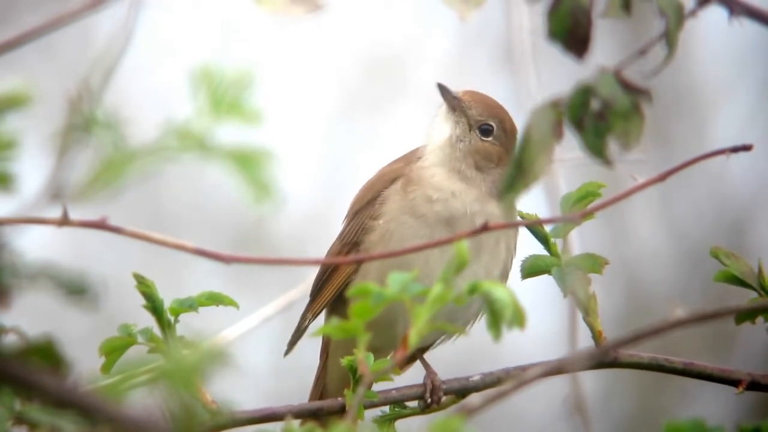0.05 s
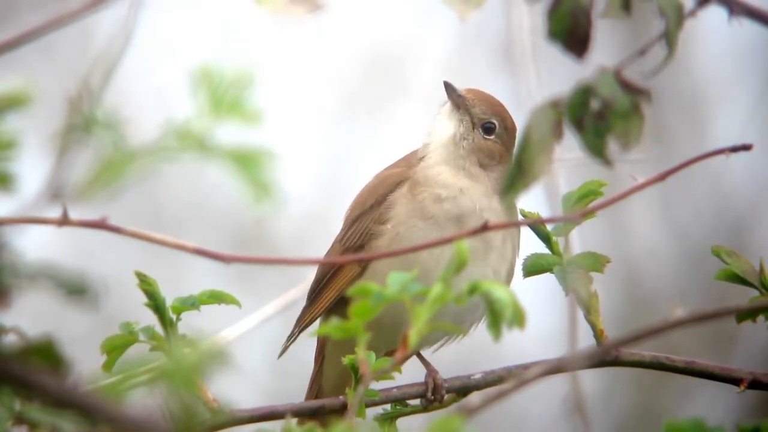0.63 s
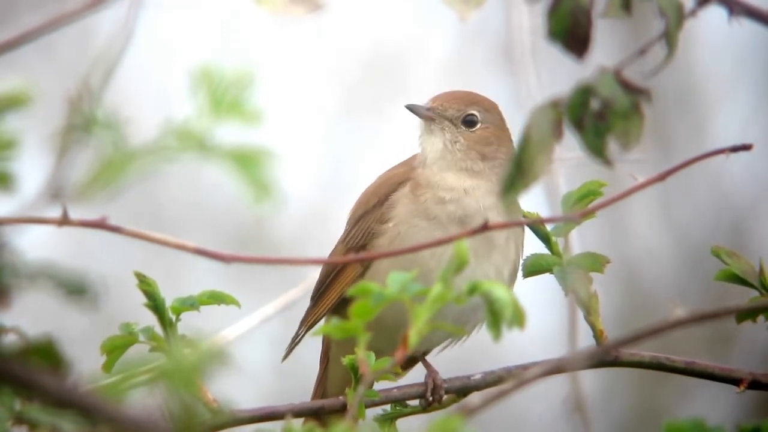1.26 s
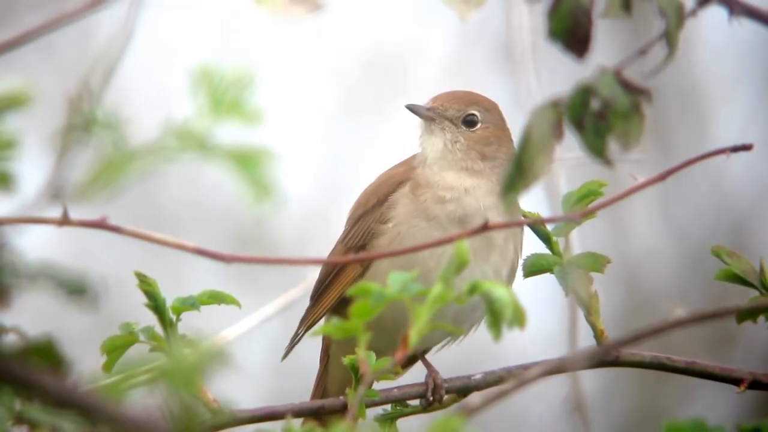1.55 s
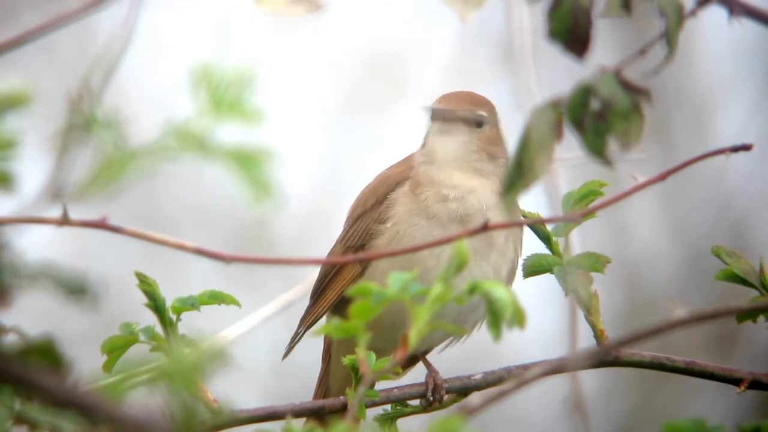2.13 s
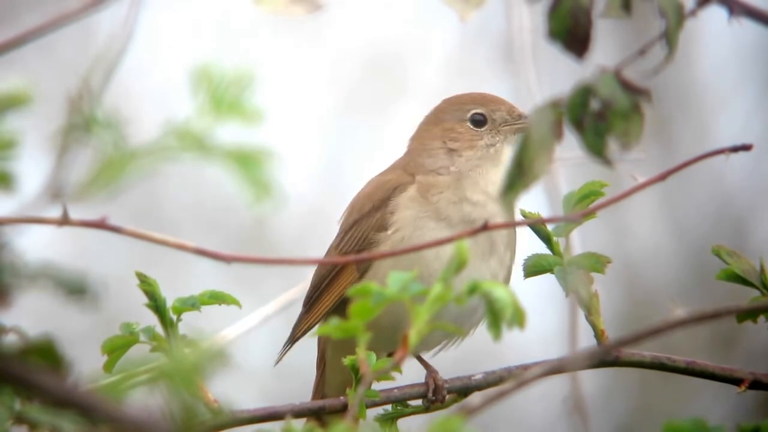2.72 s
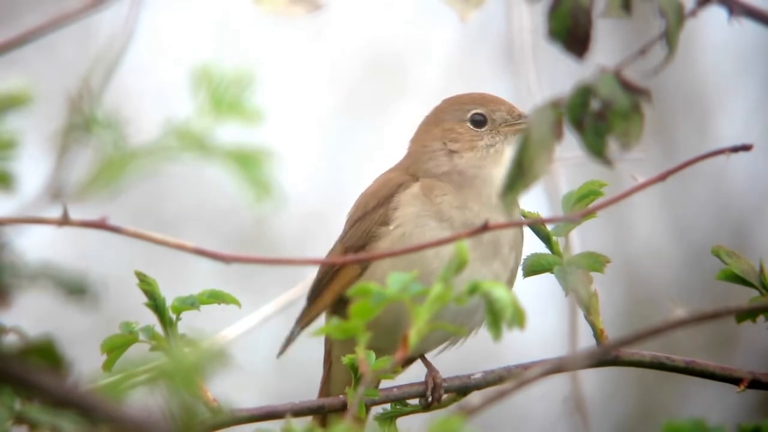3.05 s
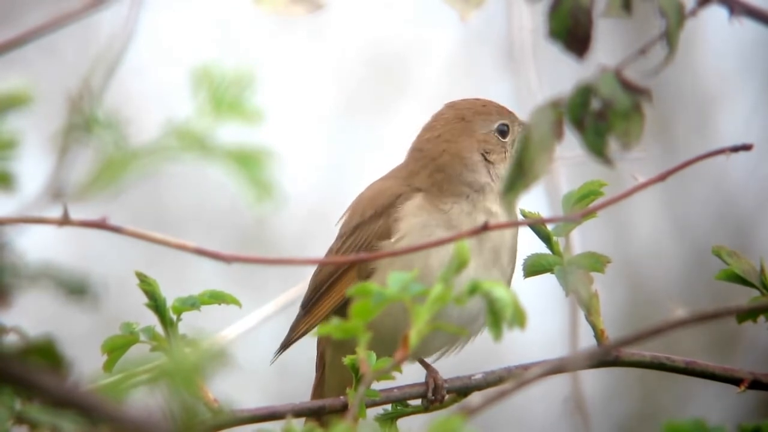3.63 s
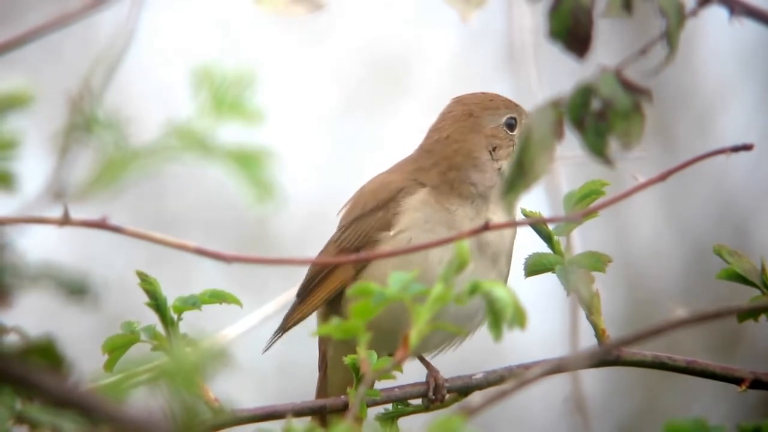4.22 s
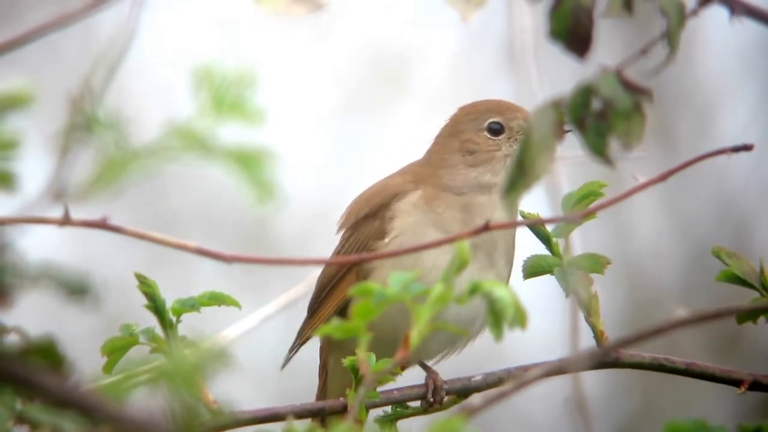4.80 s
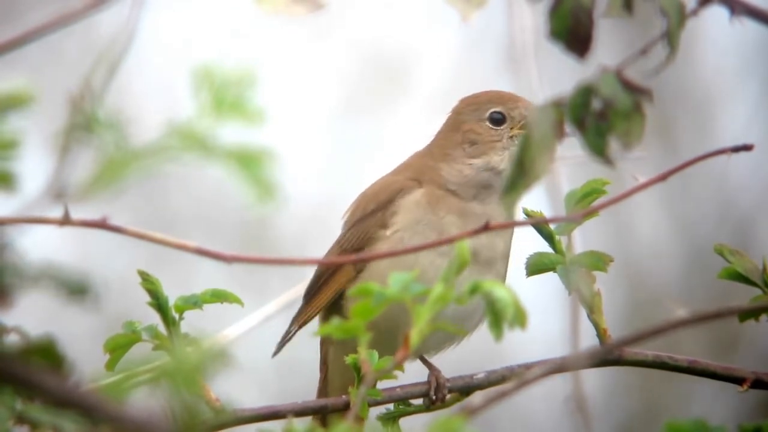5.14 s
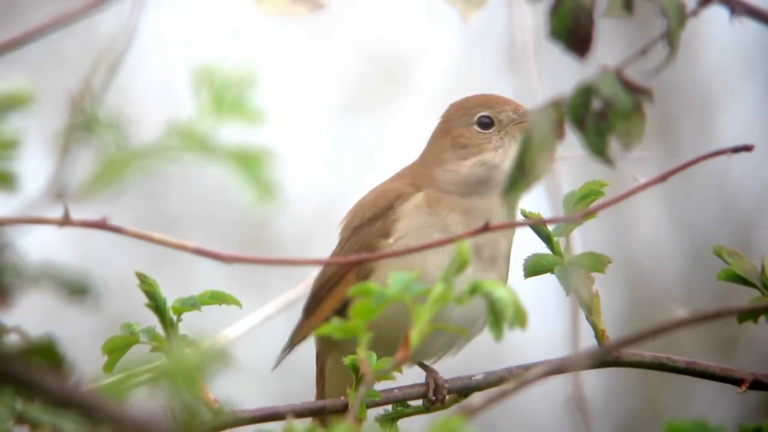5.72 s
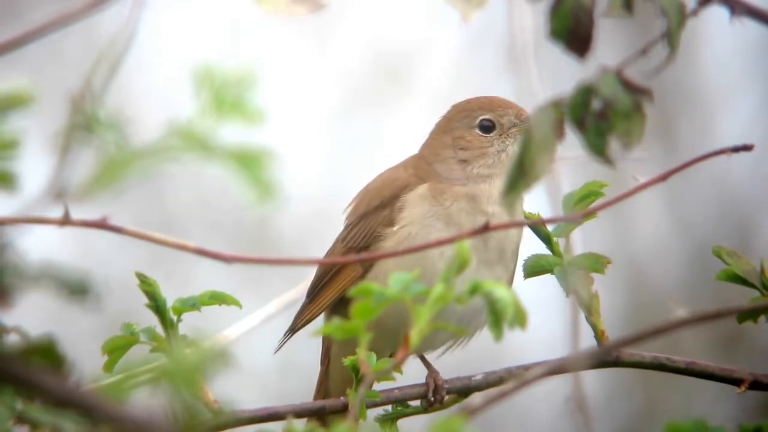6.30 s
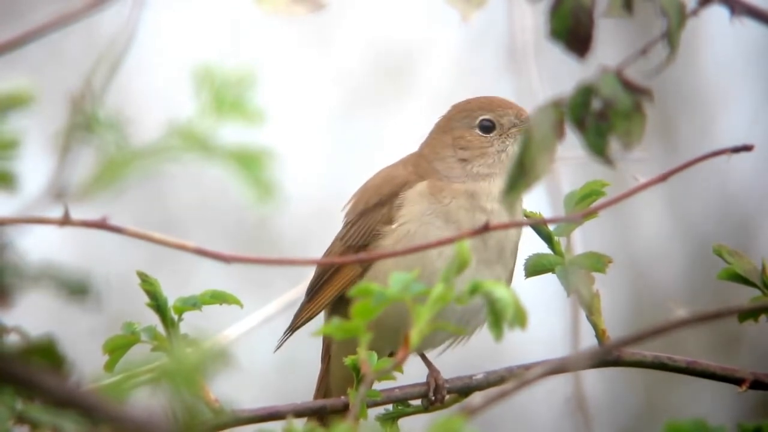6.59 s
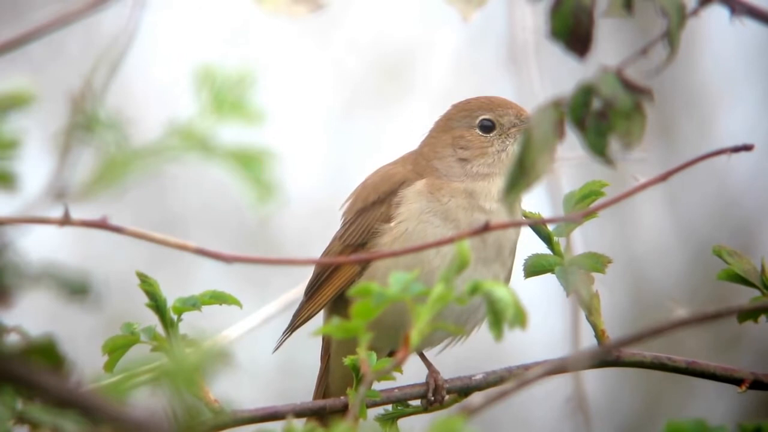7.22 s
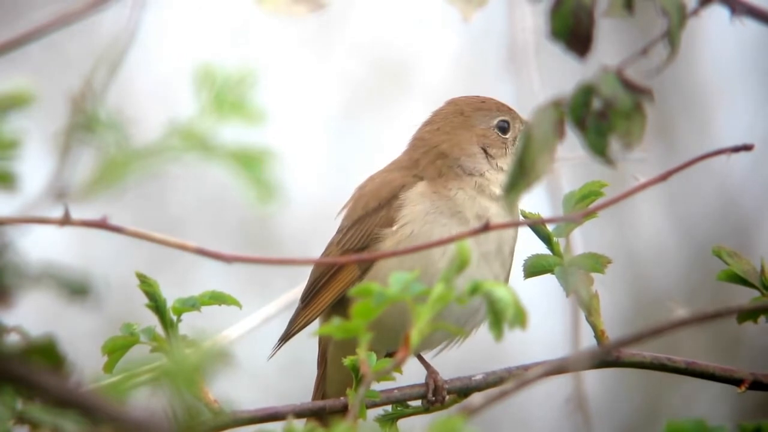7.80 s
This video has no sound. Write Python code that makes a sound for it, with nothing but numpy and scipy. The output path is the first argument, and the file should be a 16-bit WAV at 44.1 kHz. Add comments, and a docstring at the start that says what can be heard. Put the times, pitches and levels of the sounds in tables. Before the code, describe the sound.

Harsh bird calls and wind bumps give way to soft warbling and a close songbird's rising whistles, ending in a snap.

```python
"""A nightingale in a thicket. From the start, far traffic hums, the air rushes and small birds chip.
At 0.5 s a gull-like bird begins five harsh calls with unevenly shaking membranes; wind bumps the
microphone near 1.7, 2.5 and 4.7 s. From 2.7 s a second songbird warbles. At 3.85 s the nightingale
pushes air through its syrinx (a bird's voice box): seven rising whistles, each louder than the last,
then ticks, whips, chucks and, near 6 s, a sharp snap. Leaves and trunks give every note a short tail."""
import sys
import numpy as np
from scipy import signal
from scipy.fft import rfft, irfft
from scipy.io import wavfile
from scipy.ndimage import map_coordinates

SR = 44100
rng = np.random.default_rng(int(sys.argv[2]) if len(sys.argv) > 2 else 0)


def bounce(signal):
    """Save signal as a 16-bit WAV file at the path given by the first command-line argument."""
    frames = np.transpose(np.atleast_2d(signal))
    limited = np.clip(frames, -1, 1)
    pcm = np.round(limited * 32767).astype(np.int16)
    wavfile.write(sys.argv[1], SR, pcm)


N = 350595

# A note is one glide: t/s, length/s, level/dB, crest, then the pitches it passes through, f/Hz.
# The crest is where it is loudest (0 = start, 1 = end). Levels are set before echo and mixing.
# A stroke is a note timed from its syllable, a small group of notes sung together.

# The nightingale's whistles: t/s, length/s, level/dB, crest, middle f/Hz
WHISTLES = [(3.85, .098, -26.7, .76, 2232), (4.062, .125, -26.5, .66, 2230),
            (4.296, .125, -25.2, .62, 2310), (4.526, .12, -23.2, .57, 2280), (4.750, .11, -19.7, .58, 2290),
            (4.972, .117, -17.6, .58, 2265), (5.203, .112, -16.2, .55, 2280)]
# Steps away from the middle pitch, evenly spaced in time: f/Hz
WHISTLE_BEND = [-190, -200, -85, 80, 205, 220]


def whistles():
    """Almost pure tones that stay low, climb and level off, brightening as the beak opens."""
    notes = [(*note, *(hz + np.array(WHISTLE_BEND))) for *note, hz in WHISTLES]
    return sing(notes, fullness=1.05, waver=.0025, flutter_db=.46, overtone_db=6, opening_db=18)


# A tick, one quick drop: delay/s, length/s, level/dB, crest, pitches f/Hz
TICK = [(0, .01, 0, .28, 2100, 1720, 1370, 1200)]
# The ticks: t/s, level/dB
TICKS = [(5.383, -32), (5.419, -32), (5.463, -33.5)]
# The soft parts of a chuck: delay/s, length/s, crest, pitches f/Hz
CHUCK_MURMUR = (-.028, .017, .75, 1620, 1690, 1770, 1970)
CHUCK_FLICK = (-.016, .008, .5, 1890, 2440)
CHUCK_TRAIL = (.011, .012, .35, 2780, 2450)
# Its loud fall: delay/s, length/s, pitches f/Hz
CHUCK_FALL = (0, .013, 3900, 3280, 3020, 2780)
# The chucks: the fall's t/s, level/dB and crest, then flick level/dB relative to the fall
CHUCKS = [(5.703, -16.5, .45, -7.5), (5.790, -14.3, .45, -9), (5.8835, -14.5, .72, -6)]


def ticks_and_chucks():
    """Ticks drop quickly; in a chuck a low murmur flicks up, then a loud stroke falls and trails off."""
    notes = repeat(TICK, TICKS)
    delay, length, *pitches = CHUCK_FALL
    for start, db, crest, flick_db in CHUCKS:
        notes += [stroke(CHUCK_MURMUR, start, db - 18), stroke(CHUCK_FLICK, start, db + flick_db),
                  (start + delay, length, db, crest, *pitches), stroke(CHUCK_TRAIL, start, db - 7.5)]
    return sing(notes, fullness=.6, waver=.008, flutter_db=1, overtone_db=6, rasp_db=-16, falloff_db=-4.5)


# The three parts of a whip: delay/s, length/s, crest, pitches f/Hz
WHIP_FLICK = (0, .008, .65, 4300, 5700, 6700)
WHIP_ARCH = (.005, .018, .5, 5200, 6000, 5700, 4800)
WHIP_FALL = (.012, .025, .55, 5500, 4300, 3550, 3150)
# The whips: t/s, fall level/dB, then flick and arch level/dB relative to the fall
WHIPS = [(5.524, -20, -15, -8), (5.594, -26, -1, 2.5)]


def whips():
    """The voice flicks up, breaks into a harsh arch, then slides down."""
    notes = []
    for start, db, flick_db, arch_db in WHIPS:
        notes += [stroke(WHIP_FLICK, start, db + flick_db), stroke(WHIP_ARCH, start, db + arch_db),
                  stroke(WHIP_FALL, start, db)]
    return sing(notes, fullness=.8, waver=.015, flutter_db=1.5,
                overtone_db=-6, rasp_db=-16.5, octave_db=-3.5, falloff_db=-4)


# The notes inside the snap: t/s, length/s, level/dB, crest, pitches f/Hz
SNAP_NOTES = [(5.9505, .012, -25.5, .4, 4300, 5900, 5850, 5300), (5.9595, .014, -32, .3, 5100, 4500, 4000),
              (5.954, .016, -41, .25, 2700, 2100, 1450)]
# Its burst of noise: t/s, level/dB
SNAP_BURST = (5.9505, -21.5)
# The tone colour of that burst: f/Hz, level/dB
SNAP_COLOUR = [(900, -46), (2200, -17), (2900, -23), (4500, -9), (6000, -3), (7400, -19.5), (10500, -16.5),
               (15500, -28)]


def snap(rise_s=.0034, decay_s=.007):
    """Three tiny notes and a harsh burst of noise end the phrase."""
    out = sing(SNAP_NOTES, fullness=.8, waver=.03, flutter_db=2,
               overtone_db=-6, rasp_db=-12, octave_db=-4)
    start, db = SNAP_BURST
    t = np.arange(SR // 16) / SR
    burst = unit(colour(rng.standard_normal(len(t)), SNAP_COLOUR))
    envelope = np.minimum(t / rise_s, 1) ** 2 * np.exp(-np.maximum(t - rise_s, 0) / decay_s)
    add(out, start, undb(db) * burst * envelope)
    return out


def nightingale():
    """The nearest singer: its whole phrase, with a light echo from the leaves."""
    song = whistles() + ticks_and_chucks() + whips() + snap()
    return thicket(song, echo_db=-1, leaf_s=.2, wood_s=.72, wood_db=-8, spread=.95)


# How strong an overtone (a multiple of the pitch) is where it lands: f/Hz, level/dB
OVERTONES = [(4500, -38.5), (7000, -44), (9000, -45), (11000, -42), (12100, -32.5), (13300, -42.5),
             (14500, -41.5), (15500, -54)]
# The hiss of a syrinx pushed hard: f/Hz, level/dB
RASP = [(3000, -10), (5000, 7), (6000, 10), (7100, 3), (7900, -10), (9500, 0), (11000, 3), (12200, 1),
        (12800, -12), (15500, -14)]


def sing(notes, fullness, waver, flutter_db,
         overtone_db=0, rasp_db=-48, opening_db=0, octave_db=0, falloff_db=0):
    """The syrinx makes a gliding tone; louder notes have more overtones, and the highest turn harsh."""
    out = np.zeros(N)
    hiss = unit(colour(rng.standard_normal(N), RASP))
    for start, length, db, crest, *pitches in notes:
        n, first = int(length * SR), int(start * SR)
        progress = np.linspace(0, 1, n)
        glide = np.polyfit(np.linspace(0, 1, len(pitches)), pitches, len(pitches) - 1)
        hz = np.polyval(glide, progress) * (1 + waver * wander(n, 266))
        phase = 2 * np.pi * np.cumsum(hz) / SR
        pressure = swell(progress, crest, fullness) * undb(flutter_db * wander(n, 107))
        overtones = sum(undb(along(OVERTONES, k * hz) + falloff_db * (k - 2))
                        * (k * hz < SR / 2) * np.sin(k * phase) for k in range(2, 7))
        brightness = undb(overtone_db + 2.8 * min(db + 19.5, 0) + opening_db * (progress - 1))
        strain = undb(rasp_db) * np.clip((hz - 3500) / 2500, 0, 1)
        harshness = strain * (hiss[first:first + n] + undb(octave_db) * np.sin(2 * phase))
        tone = np.sin(phase) + brightness * overtones + harshness
        add(out, start, np.sqrt(2) * undb(db) * pressure * tone)
    return out


# The two strokes of a seesaw: delay/s, length/s, level/dB, crest, pitches f/Hz
SEESAW_RISE = (0, .067, -3, .45, 4450, 4800, 5300, 5550)
SEESAW_ANSWER = (.062, .075, 0, .4, 4780, 4430, 4380)
# The seesaws: t/s, level/dB, pitch multiplier for the rise
SEESAWS = [(3.0, -60, .92), (3.17, -55.5, 1.1), (3.33, -50, .92), (3.51, -48.5, 1.02), (3.68, -46.5, 1.0)]


def seesaw_notes():
    """The second songbird's up-and-down: the rise starts higher or lower, the answer hardly changes."""
    notes = []
    for start, db, ratio in SEESAWS:
        rise = (*SEESAW_RISE[:4], *(ratio * np.array(SEESAW_RISE[4:])))
        notes += repeat([rise, SEESAW_ANSWER], [(start, db)], vary=.008)
    return notes


# The second songbird's syllables: delay/s, length/s, level/dB, crest, pitches f/Hz
SLIDE = [(0, .14, 0, .4, 7750, 7280, 6980)]  # thin, high and sinking
SQUEAK = [(0, .04, 0, .4, 7100, 7150, 6500, 5700)]  # a short high drop
SWEEP = [(-.033, .042, -1, .7, 3720, 3650, 3720), (0, .09, 0, .23, 3730, 4820, 5450, 5780)]  # a level start, then a long climb
PIPE = [(0, .1, 0, .73, 3960, 3780, 3800, 3730), (.097, .048, -4.5, .45, 3700, 3200)]  # a held note that droops
SCOOP = [(-.07, .026, -3, .5, 4200, 3150, 2780), (-.05, .047, 2, .5, 2880, 3150, 3230),
         (0, .072, -.5, .2, 3150, 3990, 4270, 4350)]  # a dive, a step and a climb
# When each is sung: t/s, level/dB
SLIDES = [(2.68, -62), (3.10, -64)]
SQUEAKS = [(3.235, -56.5), (3.372, -56), (3.418, -58), (3.785, -61)]
SWEEPS = [(3.893, -41.5), (4.073, -42), (4.262, -39.5)]
PIPES = [(4.412, -33), (4.63, -36)]
SCOOPS = [(4.93, -42.5), (5.132, -45.5), (5.335, -44)]
# Notes it sings only once: t/s, length/s, level/dB, crest, pitches f/Hz
SINGLE_NOTES = [(3.50, .1, -47.5, .3, 2200, 2600, 3120), (3.59, .058, -37, .85, 3040, 3390, 3920),
                (3.905, .04, -47, .5, 3550, 3450, 3200), (4.035, .075, -50, .25, 3080, 2830, 2700),
                (4.422, .04, -53, .5, 7100, 7800, 7620, 7000), (5.02, .05, -46, .6, 4200, 3900, 3400),
                (5.16, .05, -49, .5, 4100, 4550, 4800), (5.475, .046, -37, .5, 2560, 3470, 3570, 3100)]
# Its soft ticks: t/s, length/s, level/dB, f/Hz
SOFT_TICKS = [(3.143, .012, -52, 4000), (3.158, .012, -53, 3950), (3.195, .018, -52, 1850),
              (3.195, .014, -56, 3100), (3.372, .016, -52, 2350), (3.372, .016, -51, 3500),
              (3.728, .012, -50, 4200)]


def second_songbird():
    """A neighbour repeats each syllable a few times and moves on, with faint chatter in between."""
    phrase = repeat(SLIDE, SLIDES) + seesaw_notes() + repeat(SQUEAK, SQUEAKS, vary=.02)
    phrase += repeat(SWEEP, SWEEPS, vary=.003) + repeat(PIPE, PIPES) + repeat(SCOOP, SCOOPS, vary=.01)
    warble = sing(phrase + SINGLE_NOTES, fullness=.63, waver=.005, flutter_db=2.2)
    chatter = twitter(start=3, end=3.8, count=30, db=-59.5, centre_hz=4700, length_s=.04)
    chatter += twitter(start=3.8, end=5.3, count=16, db=-57, centre_hz=3300, length_s=.06)
    warble += sing(chatter + sagging(SOFT_TICKS, sag=.12), fullness=.88, waver=.015, flutter_db=2.5)
    return thicket(warble, echo_db=7.5, leaf_s=.2, wood_s=1, wood_db=-10, spread=1)


# Harsh calls: t/s, length/s, top f/Hz, level/dB, roughness (0-1), second voice (0-1), crest,
# treble tilt/dB per octave, middle ring level/dB, top ring level/dB
CAWS = [(0.53, .115, 994, -42, .65, .25, .6, -3.5, 5, 1), (0.908, .185, 878, -36.3, .32, .1, .46, 0, -3, 4),
        (1.462, .2, 838, -38.6, .48, .2, .42, -1.4, -.5, -2),
        (2.05, .31, 875, -39.6, .62, .3, .52, -1.3, 3, -3),
        (2.775, .255, 885, -39.2, .8, .65, .54, -3.3, 5, 2)]
# How the throat colours them: f/Hz, level/dB
CAW_THROAT = [(600, -15), (850, -10), (1200, -11), (1750, -.5), (2150, -3), (2650, -4), (3050, -8),
              (3600, -8), (4300, -9.5), (4750, -20), (5300, -7.5), (6000, -8), (6500, -21), (7300, -29),
              (8500, -19), (11000, -37)]


def gull_like_bird(arch=.27, jitter=.04, rasp=.7, second_ratio=.8, brighten=.06):
    """Membranes shake unevenly in arching calls; the other side of the syrinx joins at a lower pitch."""
    out = np.zeros(N)
    for start, length, top_hz, db, rough, second, crest, tilt_db, mid_db, top_db in CAWS:
        n = int(length * SR)
        progress = np.linspace(0, 1, n)
        pressure = swell(progress, crest, fullness=1.15)
        shake = rough * np.sqrt(pressure)

        def side(pitch_hz):
            """One side of the syrinx: 16 harmonics, each trembling on its own."""
            wobble = 1 + jitter * shake * (wander(n, 500) + .5 * wander(n, 90))
            hz = pitch_hz * (1 - arch * (2 * progress - .92) ** 2) * wobble
            phase = 2 * np.pi * np.cumsum(hz) / SR
            tone = 0
            for k in range(1, 17):
                tremble = 1 + shake * (wander(n, 300) + 1j * wander(n, 300))
                tone += pressure ** (brighten * k) * np.exp(1j * k * phase) * tremble
            return unit(tone.real)

        voice = side(top_hz) + second * side(top_hz * second_ratio)
        voice += rasp * shake * rng.standard_normal(n)
        throat = [(hz, base_db + tilt_db * np.log2(hz) + mid_db * ring(hz, 2650) + top_db * ring(hz, 8600))
                  for hz, base_db in CAW_THROAT]
        add(out, start, undb(db) * unit(colour(voice, throat)) * pressure)
    return thicket(out, echo_db=7.5, leaf_s=.21, wood_s=.7, wood_db=-20, spread=1.7)


def ring(hz, centre_hz, octaves=.28):
    """The throat rings most at one pitch and less to either side."""
    return np.exp(-(np.log2(hz / centre_hz) / octaves) ** 2)


# A short falling chip and a thin downward slip: delay/s, length/s, level/dB, crest, pitches f/Hz
CHIP = [(0, .03, 0, .6, 5450, 4800, 4200)]
SLIP = [(0, .07, 0, .35, 6600, 6150, 5550)]
# When each is sung: t/s, level/dB
CHIPS = [(.30, -52), (.655, -60), (5.205, -50), (6.675, -57.5), (7.175, -61)]
SLIPS = [(.44, -66), (.58, -60), (2.35, -65), (2.50, -66), (6.72, -66), (6.87, -63), (7.31, -61),
         (7.45, -64)]
# Plain far whistles: t/s, length/s, level/dB, f/Hz
FAR_WHISTLES = [(.03, .14, -57, 1880), (.145, .035, -58, 3500), (.22, .045, -59, 2780),
                (.68, .04, -56, 3950), (1.255, .035, -57, 7550), (1.435, .05, -53, 4020),
                (6.89, .21, -58, 1760), (7.21, .035, -58, 1900), (7.60, .05, -59, 2880),
                (7.67, .025, -57, 2050), (7.70, .06, -60, 5400)]


def far_birds():
    """Small birds deeper in the wood, heard mostly as sound bounced off the leaves."""
    chorus = twitter(start=0, end=N / SR, count=120, db=-67.5, centre_hz=4600, length_s=.051)
    chorus += twitter(start=0, end=N / SR, count=70, db=-63, centre_hz=2300, length_s=.07)
    notes = repeat(CHIP, CHIPS, vary=.02) + repeat(SLIP, SLIPS, vary=.02) + chorus
    song = sing(notes, fullness=.69, waver=.025, flutter_db=4.8)
    song += sing(sagging(FAR_WHISTLES, sag=.06), fullness=.6, waver=.012, flutter_db=3.5)
    return thicket(song, echo_db=10.5, leaf_s=.14, wood_s=.7, wood_db=-19, spread=1)


# The tone colour of the echo: f/Hz, level/dB
LEAF_ECHO = [(1500, -7.5), (2300, -12), (3200, -12), (4200, -7), (5500, -6.5), (8000, -10), (14000, -16)]


def thicket(x, echo_db, leaf_s, wood_s, wood_db, spread):
    """Near leaves scatter a quick tail, trunks a longer one; they fade 60 dB in leaf_s and wood_s."""
    t = np.arange(SR) / SR
    common = rng.standard_normal(SR)
    near, far = rng.standard_normal((2, 2, SR))  # each has its own left and right
    onset = np.clip((t - .003) / .002, 0, 1)
    leaves = unit((common + spread * near) * onset * undb(-60 * t / leaf_s))
    wood = unit((common + far) * onset * undb(-60 * t / wood_s))
    tail = colour(leaves + undb(wood_db) * wood, LEAF_ECHO)[:, :SR * 9 // 10] / np.sqrt(SR)
    return x + undb(echo_db) * signal.fftconvolve(x[None], tail, axes=1)[:, :N]


# Gusts: peak t/s, level/dB, build-up/s, dying away/s
GUSTS = [(1.72, -21.5, .07, .14), (2.46, -27.5, .03, .06), (4.70, -21.5, .11, .1)]
# Thumps from the hardest swirls of air: t/s, level/dB, f/Hz, decay/s
EDDIES = [(1.6695, 1, 98, .011), (1.669, 4, 340, .0028), (1.69, -14, 175, .014), (1.80, -18, 120, .02),
          (2.438, -6.5, 105, .011), (2.438, -7, 240, .004), (3.254, -22, 80, .024), (4.703, -12, 86, .03),
          (4.781, -14.5, 160, .014), (4.934, -19.5, 90, .015)]


def wind(low_hz=55, high_hz=135, rise_s=.0053, left_db=-5.5, churn_db=3, ragged=.35):
    """Gusts rumble and thump, shoving the microphone's two sides opposite ways, the right one harder."""
    def rumble(edge_hz):
        """Low noise reaching up to about edge_hz."""
        band = signal.butter(3, [low_hz, max(edge_hz, 1.5 * low_hz)], "band", fs=SR, output="sos")
        return unit(signal.sosfilt(band, rng.standard_normal(N)))

    clock, t = np.arange(N) / SR, np.arange(SR // 3) / SR
    force = sum(undb(db) * np.exp(-np.maximum((peak - clock) / build_s, (clock - peak) / die_s))
                for peak, db, build_s, die_s in GUSTS)
    out = force * rumble(high_hz) * undb(churn_db * wander(N, 25))
    for start, db, hz, decay_s in EDDIES:
        envelope = np.minimum(t / rise_s, 1) * np.exp(-t / decay_s)
        thump = (np.sin(2 * np.pi * hz * t) + ragged * rumble(2 * hz)[-len(t):]) * envelope
        add(out, start, undb(db) * unit(thump) * np.sqrt(np.mean(envelope ** 2)))
    out = signal.sosfilt(signal.butter(1, low_hz / 2, "high", fs=SR, output="sos"), out)
    return out * np.array([[-undb(left_db)], [1]])


# Far engines: loudest t/s, half length/s, f/Hz, level/dB
ENGINES = [(.1, .35, 225, -50), (3.8, .45, 203, -48.5), (6.3, .22, 121, -41.5), (6.72, .22, 245, -47.5),
           (7.15, .35, 145, -54), (7.85, .25, 255, -53)]


def traffic(hum_hz=108, hum_db=-53, rise_hz_per_s=2.5, drift=.058):
    """A hum creeps up in pitch while engines swell out of it and fade."""
    def drone(hz):
        """A drifting tone, blurred by distance."""
        phase = 2 * np.pi * np.cumsum(hz * (1 + drift * wander(N, 6.5))) / SR
        sides = [wander(N, 45) * np.sin(phase) + wander(N, 45) * np.cos(phase) for _ in range(2)]
        return unit(np.array(sides))

    t = np.arange(N) / SR
    hum = undb(hum_db) * drone(hum_hz + rise_hz_per_s * t)
    return hum + sum(undb(db) * np.exp(-((t - peak) / half_s) ** 2) * drone(hz)
                     for peak, half_s, hz, db in ENGINES)


# The tone colour of the open air: f/Hz, level/dB
AIR_COLOUR = [(25, -28), (45, -9.5), (80, -5), (125, -4), (250, -7.5), (400, -13.5), (614, -17.5),
              (1020, -18), (1850, -19.3), (3500, -27.5), (5500, -29.5), (9000, -34.5), (12500, -40),
              (15500, -50)]
# How alike left and right are: f/Hz, likeness (1 = the same, -1 = opposite)
AIR_LIKENESS = [(60, -.1), (130, 0.39), (290, -0.23), (640, -0.69), (1400, -0.21), (3100, 0.18),
                (15000, -0.052)]


def air(db=-48.5, flicker_db=2):
    """A wide outdoor rush; each octave wavers on its own, the low ones most."""
    hz = bins(N)
    likeness = along(AIR_LIKENESS, hz)
    middle, side = rfft(rng.standard_normal((2, N))) * undb(along(AIR_COLOUR, hz))
    spectrum = middle + side * np.sqrt((1 - likeness) / (1 + likeness)) * np.array([[1], [-1]])
    octave = np.log2(np.clip(hz, 2 ** 5, 2 ** 14))
    out = 0
    for k in range(5, 15):
        band = irfft(spectrum * np.maximum(1 - np.abs(octave - k), 0), N)
        out += band * undb(flicker_db * (15 - k) / 10 * wander(N, 7))
    return undb(db) * out / np.std(out.mean(axis=0))


def swell(progress, crest, fullness):
    """Air pressure over a note: up to its crest, then down to nothing. Lower fullness is broader."""
    return np.abs(np.sin(np.pi * np.interp(progress, [0, crest, 1], [0, .5, 1]))) ** fullness


def stroke(shape, start, db):
    """One note from a (delay, length, crest, pitches) shape, given a time and level."""
    delay, length, *rest = shape
    return (start + delay, length, db, *rest)


def repeat(syllable, times, vary=0):
    """Notes for a syllable sung at each (start, level), its pitches straying by the share vary."""
    return [(start + delay, length, db + stroke_db, crest,
             *(np.array(pitches) * (1 + vary * rng.standard_normal(len(pitches)))))
            for start, db in times for delay, length, stroke_db, crest, *pitches in syllable]


def sagging(rows, sag):
    """Notes that start level, then lose the share sag of their pitch."""
    return [(start, length, db, .5, hz, hz * (1 - sag / 4), hz * (1 - sag))
            for start, length, db, hz in rows]


def twitter(start, end, count, db, centre_hz, length_s):
    """Faint random notes, each a short bent glide; the longer ones are softer."""
    offsets, sizes = rng.uniform(size=(count, 2)).T
    bends = rng.standard_normal((count, 4))
    times = start + (end - start) * (np.arange(count) + offsets) / count
    glides = centre_hz * np.exp(.2 * bends[:, :1] + .17 * np.cumsum(bends[:, 1:], axis=1))
    return [(min(t, N / SR - 2 * length_s), length_s * (.5 + size), db - 6 * size, .5, *pitches)
            for t, size, pitches in zip(times, sizes, np.minimum(glides, 7500))]


def undb(db):
    """Turn decibels into a multiplier."""
    return 10 ** (np.asarray(db) / 20)


def unit(x):
    """Scale a sound to an average power of 1."""
    return x / np.sqrt(np.mean(x ** 2) + 1e-20)


def along(points, hz):
    """Read between (Hz, value) points, with every octave equally wide."""
    point_hz, value = np.transpose(points)
    return np.interp(np.log(np.maximum(hz, 1)), np.log(point_hz), value)


def bins(n):
    """The frequencies that make up a sound of n samples."""
    return np.arange(n // 2 + 1) * SR / n


def colour(x, points):
    """Turn frequencies up or down along a (Hz, dB) curve."""
    n = x.shape[-1]
    return irfft(rfft(x) * undb(along(points, bins(n))), n)


def wander(n, rate):
    """A smooth random wiggle, about 1 in size, that changes rate times a second."""
    place = np.arange(n) * rate / SR
    return map_coordinates(rng.standard_normal(int(place[-1]) + 2), [place], order=2, mode="nearest")


def add(track, start, x):
    """Mix a sound into a track at start seconds."""
    first = int(start * SR)
    track[first:first + len(x)] += x[:len(track) - first]


def pan(x, db):
    """Lean a stereo sound to the left by db."""
    return x * undb(np.array([[db], [-db]]) / 2)


def scene():
    """The nearer birds sit a little to the left; far birds, air, traffic and wind surround them."""
    singers = pan(nightingale() + undb(-1.2) * second_songbird(), db=1.05)
    caws = undb(-5) * pan(gull_like_bird(), db=1)
    return singers + caws + undb(-3.5) * far_birds() + air() + traffic() + wind()


def record(dry, limit_db=-9, attack_s=.0043, release_s=.7, squeeze=.5, top_hz=15300):
    """The volume ducks after the loudest peaks and recovers slowly; peaks clip and the top is cut."""
    fade = np.exp(-np.arange(N) / SR / release_s)
    held_peak = np.maximum.accumulate(np.abs(dry).max(axis=0) / fade) * fade
    excess = np.maximum(np.log(held_peak / undb(limit_db)), 0)
    lag = np.exp(-1 / (attack_s * SR))
    smooth_excess = signal.lfilter([1 - lag], [1, -lag], excess)
    ducked = np.clip(dry * np.exp(-squeeze * smooth_excess), -1, 1)
    return signal.sosfilt(signal.ellip(10, .2, 80, top_hz, fs=SR, output="sos"), ducked)


dry = scene()
out = record(dry)
bounce(out)
```